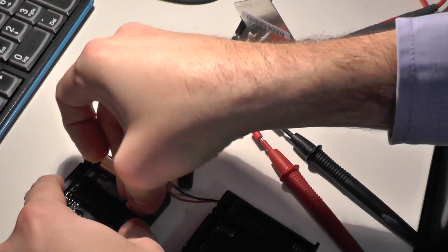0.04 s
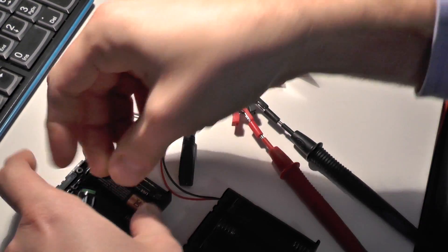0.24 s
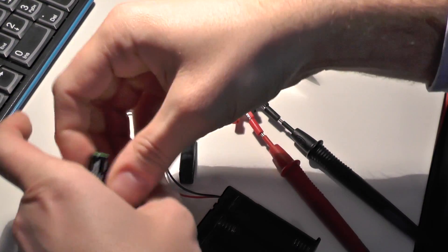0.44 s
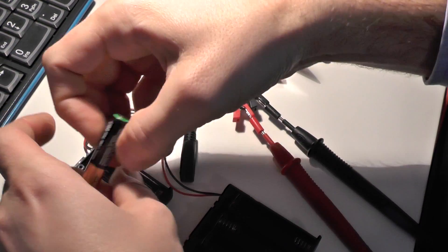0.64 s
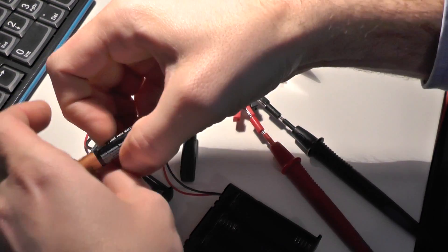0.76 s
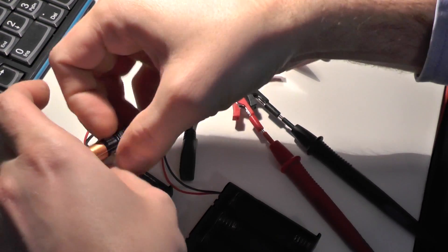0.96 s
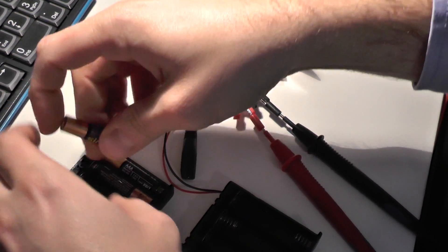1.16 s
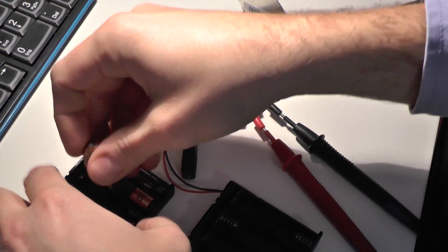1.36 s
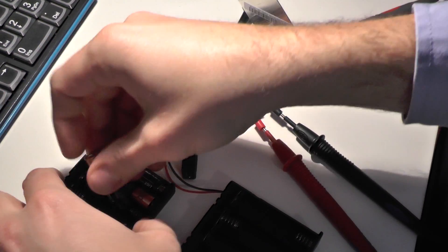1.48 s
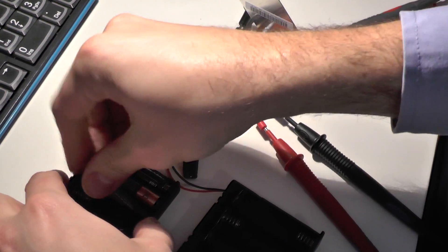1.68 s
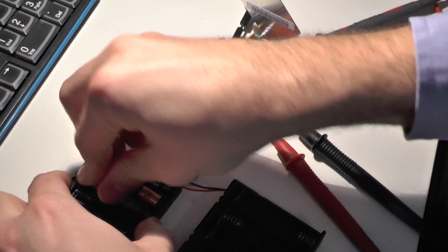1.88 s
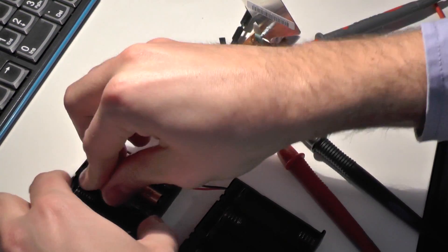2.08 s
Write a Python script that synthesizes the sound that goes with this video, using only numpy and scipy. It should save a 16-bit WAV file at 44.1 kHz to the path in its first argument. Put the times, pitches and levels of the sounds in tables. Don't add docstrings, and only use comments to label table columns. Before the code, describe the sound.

Small batteries being pushed into a plastic holder on a desk: a brief early knock, faint ticks, then a busy cluster of hollow clacks and a hard snap, heard close in stereo over faint office hum.

```python
import sys
import numpy as np
from scipy import signal
from scipy.fft import rfft, irfft, next_fast_len
from scipy.io import wavfile

SR = 44100
rng = np.random.default_rng(int(sys.argv[2]) if len(sys.argv) > 2 else 0)


def convert_level_to_amplitude(level_db):
    exponent = np.asarray(level_db, float) / 20
    return 10 ** exponent


def inscribe(sig):
    pcm = np.round(np.clip(np.atleast_2d(sig).T, -1, 1) * 32767)
    wavfile.write(sys.argv[1], SR, pcm.astype(np.int16))


N = 93580

# start in seconds, peak level in dB, hollow pitch in Hz, desk thump level in dB.
HOLDER_KNOCKS = [(1.4285, -17, 1800, -62), (.002, -46.5, 690, -52), (1.9383, -21, 1130, -49),
                 (0.2, -28.5, 620, -40.5), (0.1286, -26.5, 800, -43), (0.16, -36, 980, -46),
                 (0.1878, -17, 645, -33), (1.4141, -15.5, 790, -31.5), (1.4284, -11, 1350, -31),
                 (1.4541, -18, 596, -39), (1.4985, -34, 688, -52), (1.5873, -33, 740, -42),
                 (1.6766, -29, 650, -36.5), (1.7325, -20.5, 890, -70), (1.7368, -12.5, 1470, -28.5),
                 (1.7368, -13, 514, -32.5), (1.7392, -22, 1140, -47.5), (1.7672, -23.5, 910, -42),
                 (1.783, -34, 880, -42.5), (1.445, -24, 850, -75), (1.51, -64, 600, -46),
                 (0.19, -20.5, 1350, -46), (1.862, -41.5, 600, -51), (1.9274, -19.5, 1300, -48),
                 (1.9307, -20.5, 1600, -36.5), (1.9391, -8, 1440, -56), (1.9338, -21, 1100, -45),
                 (1.937, -6.5, 778, -41), (2.1099, -24.5, 1180, -41.5)]
KNOCK_CYCLES, KNOCK_SOFT_HZ = 6.65, 2050
# pitch in Hz, level in dB, time to fade by 60 dB in seconds.
DESK_RINGS = [(109.8, 0.5, 0.13), (254, -4, 0.068), (329.4, -7, 0.1), (460, -45, 0.01)]

# start in seconds, peak level in dB, pitch in Hz, sharp edge level in dB.
CELL_TICKS = [(.1283, -38, 2460, -45), (0.1852, -38, 3740, -52), (.188, -20.5, 3400, -41),
              (0.1921, -28, 4430, -37), (0.5606, -41.5, 3000, -48), (0.5739, -41, 4070, -50),
              (.577, -29, 4440, -39.5), (0.663, -50, 5540, -62), (0.7166, -48.5, 4200, -62),
              (0.8372, -48.5, 6100, -52), (1.286, -47, 3922, -67), (1.4131, -24, 2730, -41),
              (1.4246, -31.5, 4650, -53), (1.428, -18.5, 3503, -50), (1.4545, -41, 5500, -38),
              (1.477, -40, 6000, -48), (1.6415, -63, 4400, -42), (1.677, -41, 3905, -47),
              (1.705, -42.5, 4369, -54), (1.731, -32, 4200, -31), (1.7345, -19.5, 3741, -27),
              (1.7455, -44, 4730, -34), (1.807, -52, 4000, -36), (1.9293, -34, 7000, -35),
              (1.933, -25, 4800, -42), (1.9342, -16.5, 4640, -31), (1.9368, -5.5, 3880, -7),
              (2.0907, -36, 4300, -52), (2.0938, -40, 4600, -43), (2.108, -38, 6800, -44)]
TICK_CYCLES, TICK_SPREAD_S, TICK_DETUNE = 15, 0.0012, 0.63
TICK_DB, TICK_LOSS_DB = 0.5, 8.5
EDGE_DB, EDGE_RISE_S, EDGE_T60_S = 0.5, 0.00047, 0.0077

# start in seconds, peak level in dB, pitch in Hz, time to fade by 60 dB in seconds.
SPRING_PINGS = [(1.596, -45, 454, .04), (1.686, -42, 460, 0.049), (1.745, -31.5, 445, .04),
                (1.465, -40.5, 480, .07), (1.768, -37.5, 780, .05), (.577, -64, 4074, 0.016),
                (.893, -56, 1050, 0.11), (1.938, -49, 2400, 0.13), (1.939, -48, 4780, .04),
                (1.939, -29, 6600, 0.034), (2.109, -52, 6200, 0.063)]

# start in seconds, length in seconds, level in dB.
FINGER_RUBS = [
    (0.12, 0.11, -53.5),
    (1.034, 0.14, -69),
    (1.438, 0.094, -47),
    (1.59, 0.39, -61),
    (1.722, 0.097, -52),
    (2.8, 0.047, -52),
    (1.425, 0.012, -32.5),
    (2.09, 0.053, -58),
    (1.88, 0.15, -58.5),
    (1.944, 0.18, -51),
]
RUB_GRAINS_PER_S, RUB_HZ, RUB_WIDTH_HZ, RUB_AIR_DB = 16000, 4200, 2700, -14

# length in seconds, peak level in dB.
SNAP_BUMP = [
    (.004, -12.5),
    (.0055, -11.5),
]
SNAP_S = 1.9368

HOLLOW_PAN_DB, CONTACT_PAN_DB, THUMP_PAN_DB = -0.8, 0.6, 2.5
HOLLOW_SIDE_DB, EDGE_SIDE_DB = -19, -14

BOUNCE_S, BOUNCE_DB = 0.0002, -7
ECHO_S, ECHO_FIRST_DB, ECHO_AGAIN_DB, ECHO_CUT_HZ = 0.00875, -8.5, -8, 3100
ECHO_BOOM_HZ, ECHO_BOOM_WIDTH_HZ, ECHO_BOOM_DB = 598, 173, -2
# top of the band in Hz, level in dB, time to fade by 60 dB in seconds.
ROOM_BANDS = [(410, -2.5, 0.18), (900, -7.5, 0.28), (1820, -5, .22), (2940, -7, 0.15), (6100, -12.5, 0.31),
              (14800, -9, 0.092)]
ROOM_ONSET_S, ROOM_WIDTH = 0.0027, 0.067
SCATTER_DB, SCATTER_T60_S = -3.5, 0.039
TOP_HZ = 14000

# pitch in Hz, average (rms) level in dB, wobble width in Hz, left-right balance in dB.
HUM_TONES = [(103, -68, 0.37, 6.5), (121, -57.5, 0.27, 0.5), (245.4, -58.5, 2.7, 1), (300.3, -69, 4.5, .9),
             (345, -75, 4.3, .1), (1008, -80, .6, -2)]
# pitch in Hz, width in Hz, average (rms) level in dB.
FAN_WHIRR = [(1480, 27, -76), (1733, 12, -83), (2870, 290, -70), (3205, 48, -82)]
# frequency in Hz, level in dB per Hz.
AIR_CENTRE = [(50, -11.5), (160, -5.5), (290, 3), (520, -6.5), (1200, -14.5), (4600, -21), (7600, -26.5),
              (13000, -22)]
# frequency in Hz, level in dB per Hz.
AIR_SIDES = [(50, -28), (170, -11), (400, -10), (1000, -21), (2500, -45), (6000, -53.5), (9000, -30),
             (14000, -26)]
AIR_DB, AIR_FLICKER_DB = -87, 0.4
HISS_TOP_HZ, HISS_TOP_STEEPNESS = 14450, 160

OPPOSITE = [[1], [-1]]


def click(length):
    return np.r_[1., np.zeros(length)]


def ring(x, hz, t60):
    r = convert_level_to_amplitude(-60 / (t60 * SR))
    w = 2 * np.pi * hz / SR
    return signal.lfilter([0, np.sin(w)], [1, -2 * r * np.cos(w), r * r], x + 1e-18)


def cut(x, hz, kind, order=2):
    return signal.sosfilt(signal.butter(order, min(hz, .45 * SR), kind, fs=SR, output="sos"), x)


def unit(x):
    return x / np.std(x)


def add(track, s, sound):
    i = int(s * SR)
    track[i:i + len(sound)] += sound[:N - i]


def pan(x, db):
    return x * convert_level_to_amplitude(np.array([[db / 2], [-db / 2]]))


def knocks():
    hollow, blows = np.zeros(N), np.zeros(N)
    for s, db, hz, thump_db in HOLDER_KNOCKS:
        body = ring(click(2000), hz, KNOCK_CYCLES / hz)
        body -= 0.35 * ring(click(2000), 2.73 * hz, KNOCK_CYCLES / hz / 0.6)
        soft_blow = np.hanning(int(.3 * SR / hz))
        knock = np.convolve(body, soft_blow)[:2000] * 7.77 * hz / SR
        knock = cut(cut(knock, KNOCK_SOFT_HZ, "low"), 377, "high")
        add(hollow, s, -convert_level_to_amplitude(db) * knock)
        add(blows, s, convert_level_to_amplitude(thump_db) * click(2000))
    dull_blows = cut(blows, 990, "low")
    desk = np.zeros(N)
    for k, (hz, db, t60) in enumerate(DESK_RINGS):
        desk += convert_level_to_amplitude(db) * ring(dull_blows, hz, t60) * (-1) ** k
    return hollow, cut(desk, 128, "high")


def ticks():
    touches, edges = np.zeros(N), np.zeros(N)
    t = np.arange(900) / SR
    for s, db, hz, edge_db in CELL_TICKS:
        for k, (late, detune, size) in enumerate(rng.random((5, 3))):
            pitch = hz * (1 + TICK_DETUNE * (detune - .5) * (k > 0))
            once = ring(click(900), pitch, TICK_CYCLES / pitch / 2)
            twice = ring(once, pitch, TICK_CYCLES / pitch / 4)
            delay = (k + late - .5) * TICK_SPREAD_S if k else 0
            level = convert_level_to_amplitude(db + TICK_DB - TICK_LOSS_DB * k * size)
            add(touches, s + delay, level * twice / twice.max())
        fade = convert_level_to_amplitude(edge_db + EDGE_DB - 60 * t / EDGE_T60_S)
        add(edges, s, fade * np.minimum(t / EDGE_RISE_S, 1) * rng.standard_normal(900))
    return touches, cut(edges, 4000, "high")


def pings():
    out = np.zeros(N)
    for s, db, hz, t60 in SPRING_PINGS:
        add(out, s, convert_level_to_amplitude(db) * ring(click(SR // 4), hz, t60))
    return out


def rubs():
    level = np.zeros(N)
    for s, length, db in FINGER_RUBS:
        u = np.linspace(0, 1, int(length * SR))
        add(level, s, convert_level_to_amplitude(db) * np.minimum(u / 0.11, 1) * (1 - u) ** 1.2)
    slips = rng.random(N) < RUB_GRAINS_PER_S / SR
    unevenness = convert_level_to_amplitude(2 * np.minimum(rng.exponential(1, N), 4))
    grains = slips * rng.standard_normal(N) * unevenness
    plastic = unit(cut(ring(grains, RUB_HZ, 1.54 / RUB_WIDTH_HZ), 1700, "high"))
    airy = unit(cut(grains, 7000, "high"))
    return level * (plastic + convert_level_to_amplitude(RUB_AIR_DB) * airy)


def jolt():
    bump = np.zeros((2, N))
    for track, (length, db) in zip(bump, SNAP_BUMP):
        add(track, SNAP_S, convert_level_to_amplitude(db) * np.bartlett(int(length * SR)))
    return cut(bump, 32, "high") * OPPOSITE


def fading(noise, db, t60):
    t = np.arange(noise.shape[1]) / SR
    return convert_level_to_amplitude(db - 60 * t / t60) * np.sqrt(14 / (t60 * SR)) * noise


def room_tail():
    length = SR // 2
    scatter = cut(rng.standard_normal((2, length)), 740, "high")
    tail = fading(scatter, SCATTER_DB, SCATTER_T60_S)
    low_hz = 90
    for top_hz, db, t60 in ROOM_BANDS:
        band = cut(cut(rng.standard_normal((2, length)), top_hz, "low"), low_hz, "high")
        tail += fading(band, db, t60)
        low_hz = top_hz
    mid, side = tail * (1 - np.exp(-np.arange(length) / SR / ROOM_ONSET_S))
    return mid + ROOM_WIDTH * side * OPPOSITE


def space(x):
    size = next_fast_len(N + SR)
    w = 2j * np.pi * np.arange(size // 2 + 1) * SR / size
    boom = w * 2 * np.pi * ECHO_BOOM_WIDTH_HZ
    boom = boom / (w ** 2 + boom + (2 * np.pi * ECHO_BOOM_HZ) ** 2)
    dulled = convert_level_to_amplitude(ECHO_FIRST_DB) / (1 + w / (2 * np.pi * ECHO_CUT_HZ))
    trip = np.exp(-w * ECHO_S) * (dulled + convert_level_to_amplitude(ECHO_BOOM_DB) * boom)
    flutter = trip / (1 - convert_level_to_amplitude(ECHO_AGAIN_DB) * trip)
    bounce = 1 + convert_level_to_amplitude(BOUNCE_DB) * np.exp(-w * BOUNCE_S)
    heard = rfft(x, size) * (1 + flutter + rfft(room_tail(), size)) * bounce / 1.498
    return cut(irfft(heard, size)[:, :N], TOP_HZ, "low", order=8)


def narrow_noise(hz, width_hz):
    return unit(ring(rng.standard_normal(N + SR), hz, 2.2 / width_hz)[SR:])


def coloured(points):
    hz, db = np.transpose(points)
    f = np.maximum(np.arange(N // 2 + 1) * SR / N, 1)
    shape = convert_level_to_amplitude(np.interp(np.log(f), np.log(hz), db))
    shape *= np.minimum(f / 35, 1) ** 2 / (1 + (f / HISS_TOP_HZ) ** HISS_TOP_STEEPNESS)
    noise = irfft(rfft(rng.standard_normal(N)) * shape, N) * np.sqrt(SR / 2)
    flicker = unit(cut(rng.standard_normal(N), 15.5, "low"))
    return noise * convert_level_to_amplitude(AIR_DB + AIR_FLICKER_DB * flicker)


def hum():
    t = np.arange(N) / SR
    tones = np.zeros((2, N))
    for hz, db, width_hz, pan_db in HUM_TONES:
        steady = np.sqrt(2) * np.sin(2 * np.pi * (hz * t + rng.random()))
        wobble = np.clip(width_hz / 6, 0, 2) * narrow_noise(hz, width_hz + 3)
        tones += convert_level_to_amplitude(db) * (pan(steady, pan_db) + wobble)
    return tones


def background():
    whirr = sum(convert_level_to_amplitude(db) * narrow_noise(hz, width_hz) for hz, width_hz, db in FAN_WHIRR)
    return hum() + whirr + coloured(AIR_CENTRE) + coloured(AIR_SIDES) * OPPOSITE


def scene():
    hollow, thump = knocks()
    touches, edge = ticks()
    tick = touches + pings()
    wide = convert_level_to_amplitude(EDGE_SIDE_DB) * np.roll(edge, 31) + convert_level_to_amplitude(HOLLOW_SIDE_DB) * np.roll(hollow + tick, 57)
    near = pan(hollow, HOLLOW_PAN_DB) + pan(thump, THUMP_PAN_DB) + wide * OPPOSITE
    near += pan(tick + edge + rubs(), CONTACT_PAN_DB)
    return space(near) + jolt() + background()


def band_limit(x):
    return signal.sosfilt(signal.butter(12, 16420, fs=SR, output="sos"), x)


def record(dry):
    return band_limit(dry)


dry = scene()
out = record(dry)
inscribe(out)
```